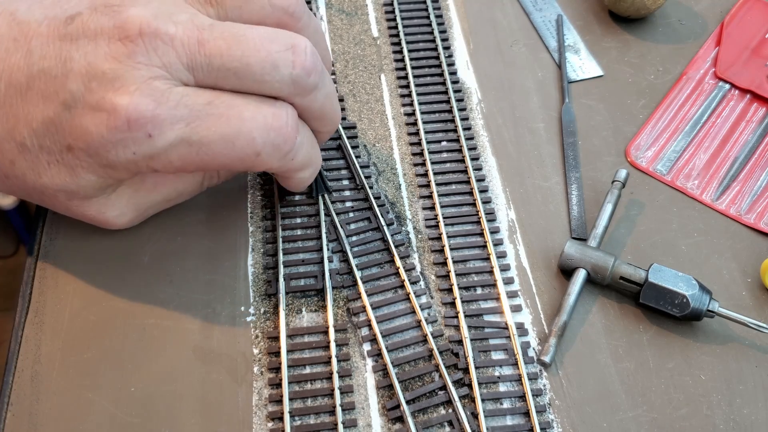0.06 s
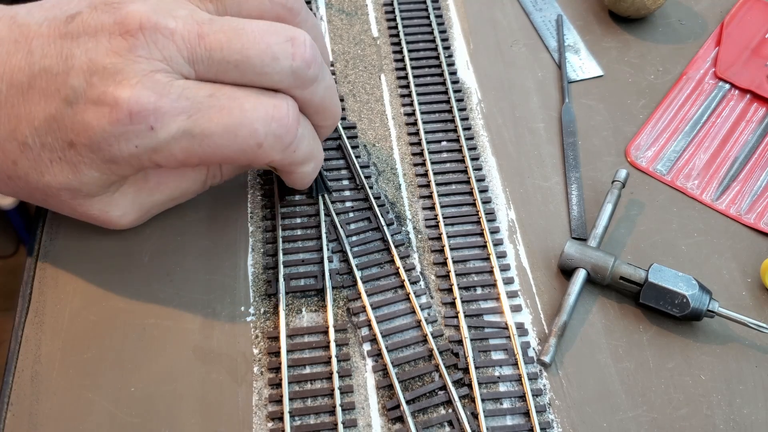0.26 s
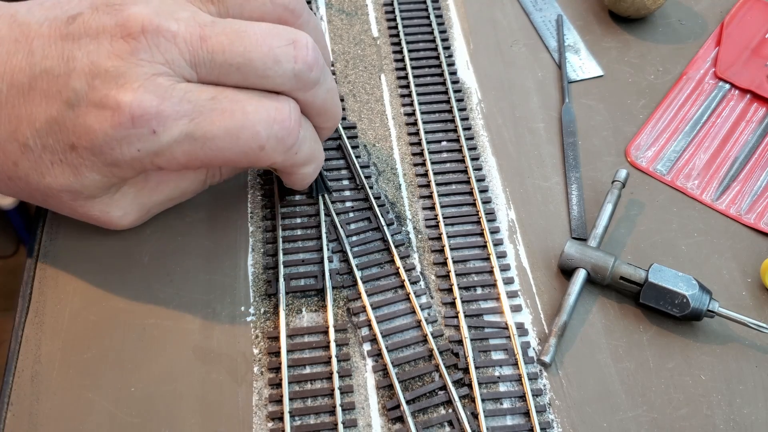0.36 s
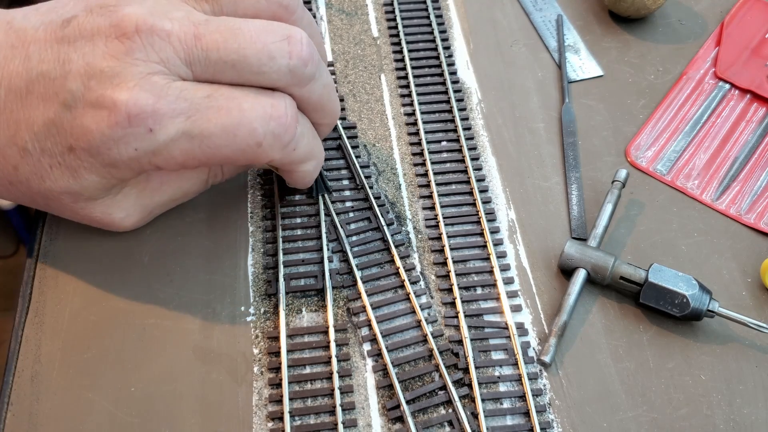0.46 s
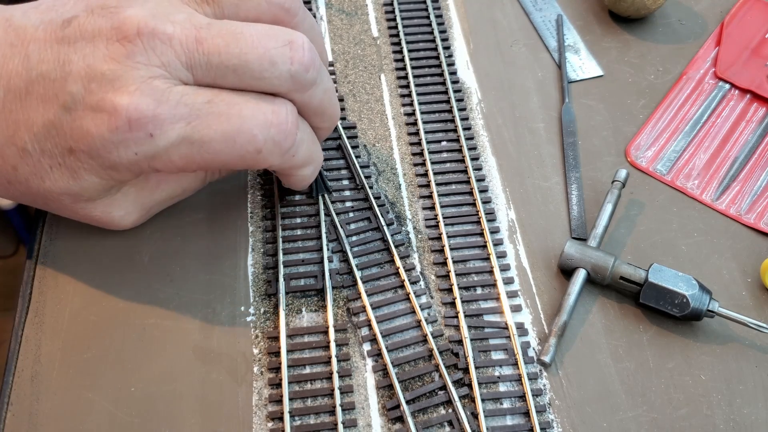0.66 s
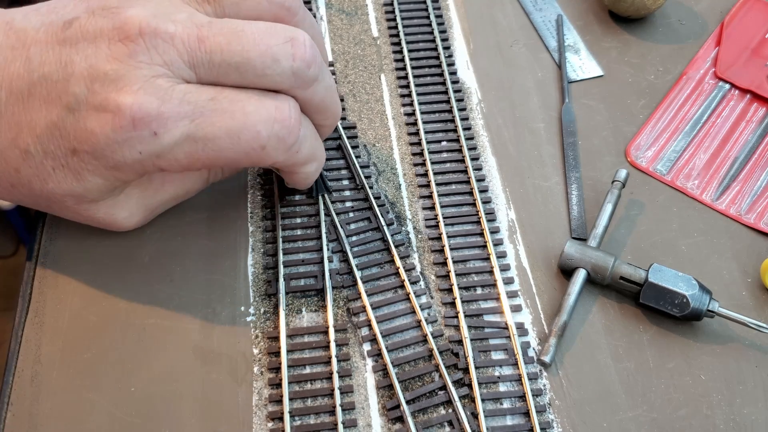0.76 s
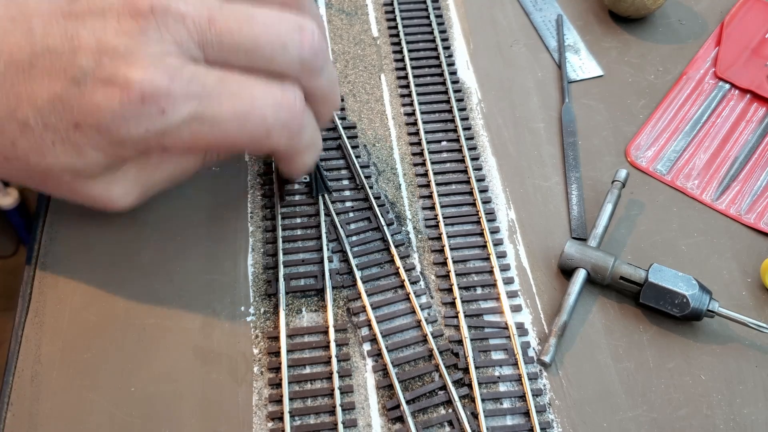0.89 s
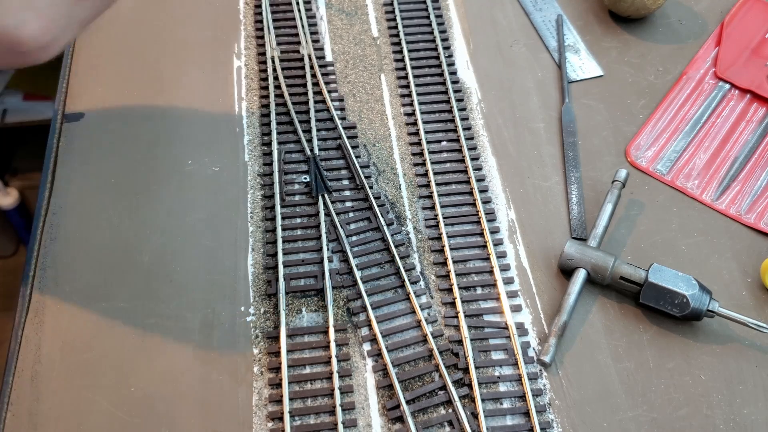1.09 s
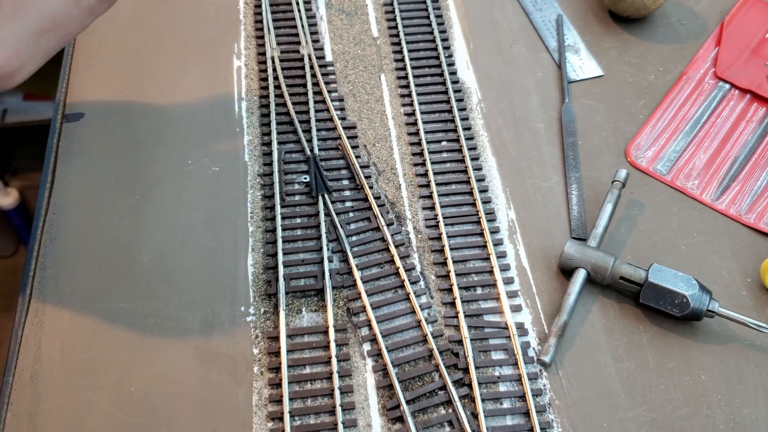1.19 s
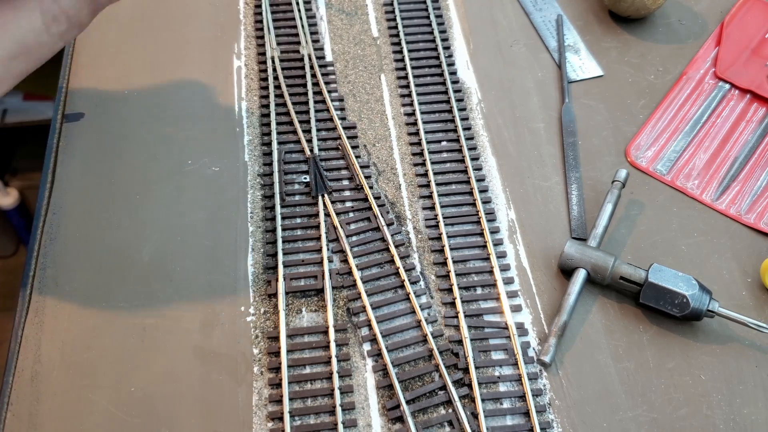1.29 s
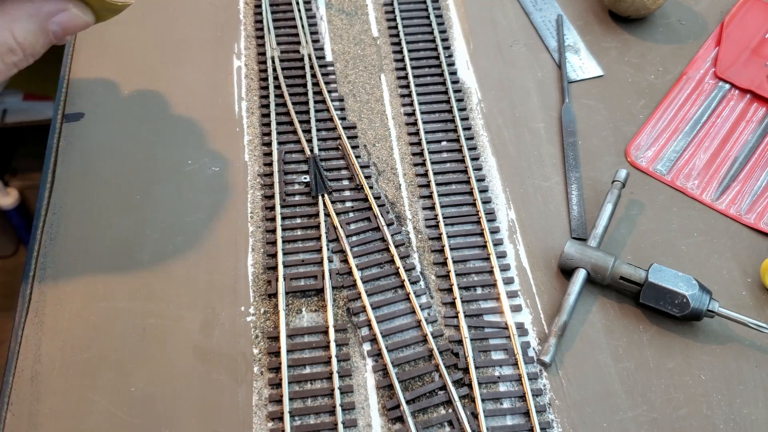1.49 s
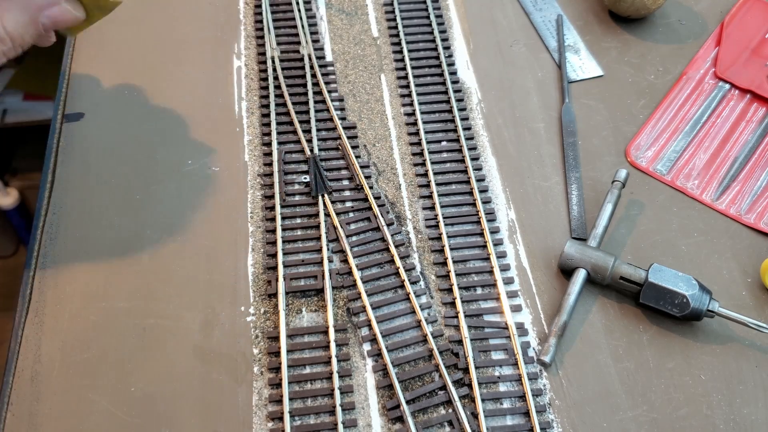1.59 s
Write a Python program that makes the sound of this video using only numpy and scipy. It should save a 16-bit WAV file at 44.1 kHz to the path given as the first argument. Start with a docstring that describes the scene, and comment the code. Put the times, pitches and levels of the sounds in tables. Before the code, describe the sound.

Sandpaper rubs a metal model rail in about seven short, light strokes during the first second, each stuttering with a little hiss and small knocks through the board. Two sharp clicks come at about 0.2 and 0.3 seconds. A brighter swipe ends the sanding near 0.9 seconds. A faint tick follows at 1.1, and a sleeve rustles softly until 1.6, all close up over a small room's low rumble.

```python
"""A small room with a low rumble, a stereo microphone close to a model track on its baseboard.
A scrap of sandpaper rubs a metal rail in short, light strokes. Each stroke stutters, shakes the board
and hisses a little; the rail clicks twice as the paper snags it. A last, brighter swipe runs off the
rail, then a faint tick, and a sleeve rustles as the arm draws back. The hand is nearer the left side."""
import sys
import numpy as np
from scipy import signal
from scipy.fft import rfft, irfft
from scipy.io import wavfile

SR = 44100
rng = np.random.default_rng(int(sys.argv[2]) if len(sys.argv) > 2 else 0)


def log_audio(samples):
    """Write samples as a 16-bit WAV file to the path given in sys.argv[1]."""
    # one column per channel
    frames = np.atleast_2d(samples).T
    # limit to full scale, then quantise
    limited = np.clip(frames, -1, 1)
    pcm = np.round(limited * 32767).astype(np.int16)
    wavfile.write(sys.argv[1], SR, pcm)


N = 72765

# Spectrum of a knock heard through the track: frequency_hz, gain_db
KNOCK_SPECTRUM = [(150, -29), (300, -7), (420, -13.5), (520, -4), (620, -7), (750, -5), (900, -4),
                  (1100, -3.5), (1330, 0.5), (1550, -12.5), (2000, -12.5), (2800, -18), (3800, -30),
                  (9000, -46)]
# Hiss of grit on metal: frequency_hz, gain_db
GRIT_SPECTRUM = [(500, 7.5), (2000, 4.5), (3000, -0.5), (3700, -3), (5000, 2.5), (7300, 5), (9500, -10.5),
                 (12000, -3), (15500, -2)]
# Spectrum of the snagged rail: frequency_hz, gain_db
SNAG_SPECTRUM = [(100, -31), (320, 2.5), (430, -18), (600, -1.5), (780, -1), (1100, 4), (1650, 6),
                 (2500, 8), (4000, -1.5), (5300, 9), (6300, 0.5), (7500, 4), (9500, -10), (11500, -7.5),
                 (15500, -16.5)]


def strokes(rail, board):
    """Seven light rubs of the sandpaper: each stutters, hisses and shakes the baseboard."""
    # start_s, rise_s, length_s, stutter_db, board_db, grit_db, judder_peak_fraction
    rubs = [(0.019, 0.0058, 0.064, -50.5, -47, -65, 0.47), (0.164, 0.016, 0.034, -51, -51, -54.5, 0.73),
            (0.31, 0.022, 0.044, -48, -48, -63, 0.62), (0.448, 0.0056, 0.032, -61, -50.5, -66.5, 0.55),
            (0.575, 0.0098, 0.065, -58, -47.5, -70, 0.57), (0.722, 0.011, 0.036, -55, -47.5, -67, 0.49),
            (0.849, 0.0043, 0.07, -57, -46.5, -70, 0.26)]
    for start, rise, length, stutter_db, board_db, grit_db, judder_peak in rubs:
        t = times(length)
        add(rail, start, stutter(t, pressure(t, rise, release_db=-8), stutter_db))
        add(rail, start, grit(t, pressure(t, rise, release_db=-21), GRIT_SPECTRUM, grit_db))
        add(board, start, baseboard(t, board_db, judder_peak))


def pressure(t, rise_s, release_db):
    """The hand's pressure builds, then eases by release_db to the end of the stroke."""
    return np.minimum(t / rise_s, 1) ** 2 * amp(release_db * np.maximum(t - rise_s, 0) / (t[-1] - rise_s))


def stutter(t, force, db):
    """The paper sticks and slips, knocking the track hardest at full pressure."""
    slips = force * grains(len(t), per_s=1100, spread_db=3)
    return at_level(knock(slips), db, t)


def knock(slips, lift_hz=1000, lift_db=0):
    """The track answers slips with a dull knock and a short ring."""
    # pitch_hz, level_db, t60_s
    track_modes = [(735, -2, .08), (855, -6, .06), (968, -5, .06), (1055, -3, .05), (1168, -4, .04),
                   (1235, -2, .04), (1335, -4, .04)]
    sound = amp(-15) * unit(signal.fftconvolve(slips, ringing(track_modes)))
    add(sound, 0, unit(colour(slips, KNOCK_SPECTRUM, lift_hz, lift_db)))
    return sound


def grit(t, force, spectrum, db):
    """Dense tiny scratches merge into a hiss that follows the force."""
    return at_level(colour(force * grains(len(t)), spectrum), db, t)


def baseboard(t, db, peak_fraction=0.4, mode_hz=323, decay_s=.003, flutter_db=4):
    """The slips lock on to the board's low mode, which judders until the stroke ends."""
    skew = np.log(.5) / np.log(peak_fraction)
    push = np.pad(abs(np.sin(np.pi * (t / t[-1]) ** skew)), (0, SR // 16))
    push *= amp(flutter_db * wander(len(push)))
    swing = signal.lfilter([1], [1, -np.exp(-1 / (decay_s * SR))], push)
    cycles = np.cumsum(mode_hz * (1 + .085 * wander(len(push)))) / SR
    return at_level(swing * np.sin(2 * np.pi * cycles), db, t)


def catches(rail, snap_s=.004):
    """The paper catches hard and lets go: the track knocks and a few grains snap free."""
    # start_s, knock_db, pitch_hz, snap_db
    hard_slips = [(0.0343, -48, 1100, -36), (0.056, -27, 1270, -60), (0.067, -32, 1240, -60),
                  (0.173, -20.5, 1240, -25.5), (0.452, -33.5, 1300, -57), (0.589, -21, 1120, -52),
                  (0.727, -21.5, 1200, -32.5), (0.7394, -27, 1070, -41), (0.855, -25.5, 1010, -57),
                  (0.921, -26, 1040, -46)]
    t = times(snap_s)
    for start, knock_db, hz, snap_db in hard_slips:
        sound = amp(knock_db) * knock(np.ones(1), hz, lift_db=10)
        snap = colour((1 - t / snap_s) * grains(len(t)), GRIT_SPECTRUM)
        add(sound, 0, amp(snap_db) * unit(snap))
        add(rail, start, sound)


def snags(rail, board):
    """The paper snags twice, clicking the rail, and drags on between the clicks."""
    # start_s, level_db, lift_hz, lift_db, ring_db
    clicks = [(0.2216, 5, 1296, 8, -17.5), (0.2812, 0, 5050, 9, -23)]
    for row in clicks:
        click(rail, board, *row)
    t = times(.056)
    drag = grit(t, pressure(t, rise_s=.003, release_db=-18), SNAG_SPECTRUM, db=-43)
    add(rail, .223, drag)


def click(rail, board, start_s, db, lift_hz, lift_db, ring_db, rise_s=.0003, decay_s=.0011):
    """A hard snap rings the metal rail, knocks the track and jolts the board."""
    # pitch_hz, level_db, t60_s
    rail_modes = [(733, 0, .16), (1279, -3, .1), (1612, -1, .12), (1735, -6, .1), (2320, -3, .12),
                  (2571, -3, .1), (2820, -4, .1), (3108, -3, .12), (4580, -8, .1), (5110, -7, .08),
                  (5480, -6, .08), (6101, -7, .08), (7488, -9, .08)]
    t = times(.25)
    chatter = np.sign(rng.standard_normal(len(t))) * np.minimum(t / rise_s, 1) * np.exp(-t / decay_s)
    blow = amp(-3) * unit(chatter)
    blow[0] = 1  # the snap itself, ahead of its chatter
    sound = unit(colour(blow, SNAG_SPECTRUM, lift_hz, lift_db))
    add(sound, 0, amp(ring_db) * ringing(rail_modes))
    knock_db = -14.5 - lift_db / 2  # brighter snaps knock less
    add(sound, 0, amp(knock_db) * unit(colour(np.ones(1), KNOCK_SPECTRUM)))
    add(rail, start_s, amp(db) * sound / 2)
    add(board, start_s, baseboard(times(.022), db - 57.5))


def swipe(rail, board, start_s=.921, peak_s=.033, length_s=.064):
    """The paper speeds up along the rail, stuttering and tearing coarse grains, and lifts off."""
    # frequency_hz, gain_db
    swipe_spectrum = [(250, -25), (700, 5.5), (850, -20), (1020, -4), (1700, 6), (2200, 2.5), (2600, -6),
                      (3200, 1), (4500, -6), (7000, -5), (9500, -13.5), (14500, -11), (16000, -14.5)]
    t = times(length_s)
    speed = amp(np.interp(t, [0, peak_s, t[-1]], [-18.5, 0, -24.5]))
    scrape = colour(speed * grains(len(t), per_s=3000, spread_db=3), swipe_spectrum)
    add(rail, start_s, at_level(scrape, -46, t))
    t = times(.035)
    add(rail, start_s, stutter(t, force=1, db=-46.5))
    add(board, start_s, baseboard(t, db=-50.5))


def tick(rail, board, start_s=1.14):
    """A faint tick with a high ring, once the hand has lifted."""
    # pitch_hz, level_db, t60_s
    tick_modes = [(3050, -2, .09), (3300, -5, .07), (3620, 0, .07)]
    click(rail, board, start_s, db=-29, lift_hz=3400, lift_db=10, ring_db=-16)
    add(rail, start_s, amp(-35) * ringing(tick_modes))


def sympathetic_ring(rail):
    """Every touch of the rail wakes a few narrow resonances of the track."""
    # pitch_hz, gain_db, t60_s
    resonances = [(733, 1, .17), (1050, -7, .08), (1614, -5, .1), (2320, -4, .13)]
    t, rings = times(.25), 0
    for hz, db, t60 in resonances:
        decay = amp(-60 * t / t60)
        rings += 2 * amp(db) * decay / decay.sum() * np.cos(2 * np.pi * hz * t)
    return signal.fftconvolve(rail, rings)[:N]


def sleeve():
    """Cloth fibres rub softly as the arm draws back, twice a little brighter."""
    # time_s, level_db
    slide_levels = [(1.08, -77.5), (1.16, -71.5), (1.23, -68.5), (1.33, -64.5), (1.44, -65.5),
                    (1.51, -71.5), (1.62, -98)]
    # frequency_hz, gain_db
    cloth_spectrum = [(300, -22), (800, -16), (1250, -11), (1750, 0), (2500, -2.5), (4000, -10),
                      (5000, -19), (8000, -29), (15000, -33)]
    # Brighter brushes of the cloth: start_s, length_s, level_db
    brushes = [(1.143, 0.037, -71.5), (1.37, 0.099, -67)]
    # frequency_hz, gain_db
    brush_spectrum = [(1000, -1), (2500, -11), (4000, -6.5), (7500, -9), (9500, -19), (15500, -12.5)]
    t = np.arange(N) / SR
    fibres = colour(grains(N, per_s=8100), cloth_spectrum)[:N]
    sound = at_level(fibres, np.interp(t, *np.transpose(slide_levels)), t) * (t > slide_levels[0][0])
    for start, length, db in brushes:
        t = times(length)
        add(sound, start, grit(t, np.sin(np.pi * t / length), brush_spectrum, db))
    return sound


def table_shudder(centre_hz=56, half_width_hz=13):
    """The table shudders low while the hand works on it."""
    # time_s, level_db
    shudder_levels = [(0, -60), (.24, -62), (.4, -71), (.8, -67), (1.1, -70), (1.35, -71), (1.65, -83)]
    hz, t = np.fft.rfftfreq(N, 1 / SR), np.arange(N) / SR
    noise = irfft(rfft(rng.standard_normal(N)) / (1 + ((hz - centre_hz) / half_width_hz) ** 2), N)
    return at_level(noise, np.interp(t, *np.transpose(shudder_levels)), t)


def room(x, echoes_per_s=2000, early_decay_s=.006, tail_rise_s=.0026):
    """Quick echoes off the table top, then the small room's short tail."""
    # frequency_hz, t60_s
    decay_times = [(200, .2), (1000, .18), (2500, .21), (6000, .205), (14000, .18)]
    t = times(.5)
    hz, when, spectra = signal.stft(rng.standard_normal((2, len(t))), SR, nperseg=256)
    spectra *= amp(-60 * when / at_hz(decay_times, hz)[:, None])
    tail = signal.istft(spectra, SR, nperseg=256)[1][:, :len(t)] * np.minimum(t / tail_rise_s, 1)
    early = np.sign(rng.standard_normal(tail.shape)) * (rng.random(tail.shape) < echoes_per_s / SR)
    early *= np.exp(-t / early_decay_s) * (t > .001)
    echoes = amp(-5.5) * unit(tail) + amp(-2) * unit(early)
    return signal.fftconvolve(x[None], echoes, axes=1)[:, :N]


def room_tone(rumble_top_hz=211, level_db=-62):
    """Low rumble, alike on both sides and easing at the end, with a faint hiss."""
    # frequency_hz, density_db
    tone_spectrum = [(20, -16), (35, -16), (55, -5), (82, 3), (105, -2), (135, 3), (185, -15), (240, -13),
                     (320, -7), (500, -18), (1000, -20.5), (2000, -23.5), (4000, -28), (7000, -29),
                     (9000, -38), (15500, -31.5)]
    # Likeness of left and right: frequency_hz, correlation
    likeness = [(50, .95), (130, .9), (300, .6), (700, .1), (3000, 0)]
    # time_s, gain_db
    rumble_levels = [(1.1, -1), (1.4, -5), (1.6, -6.5)]
    hz, t = np.fft.rfftfreq(N, 1 / SR), np.arange(N) / SR
    left, independent = rfft(rng.standard_normal((2, N)))
    alike = at_hz(likeness, hz)
    right = alike * left + np.sqrt(1 - alike ** 2) * independent
    spectra = np.array([left, right]) * amp(at_hz(tone_spectrum, hz))
    easing = amp(np.interp(t, *np.transpose(rumble_levels)))
    rumble = easing * irfft(spectra * (hz < rumble_top_hz), N)
    hiss = irfft(spectra * (hz >= rumble_top_hz), N)
    return at_level(rumble + hiss, level_db, t)


def microphone(x, right_db=-2.5, delay_s=.00029):
    """The right capsule is farther from the hand: direct sound arrives later and weaker."""
    delay = np.exp(-2j * np.pi * np.fft.rfftfreq(N, 1 / SR) * delay_s)
    return np.array([x, amp(right_db) * irfft(rfft(x) * delay, N)])


def grains(count, per_s=4200, spread_db=2.5):
    """Tiny impacts of uneven size at random moments."""
    chance, size, sign = rng.random((3, N))[:, :count]
    size_db = -spread_db * np.log(np.maximum(size, np.exp(-2) / 2))
    return (chance < per_s / SR) * amp(size_db) * np.sign(sign - .5)


def ringing(modes):
    """The dying modes of a struck part."""
    t = times(.25)
    return unit(sum(amp(db - 60 * t / t60) * np.sin(2 * np.pi * (hz * t + rng.random()))
                    for hz, db, t60 in modes))


def wander(count, smooth_s=.0024):
    """Smooth random drift of size about 1."""
    window = np.hanning(2 * round(smooth_s * SR) + 3)
    return signal.fftconvolve(rng.standard_normal(SR // 2), unit(window), "valid")[:count]


def colour(x, spectrum, lift_hz=1000, lift_db=0, lift_octaves=.33, size=2048):
    """Minimum-phase filter with the given spectrum and an optional broad peak."""
    hz = abs(np.fft.fftfreq(size, 1 / SR))
    lift = lift_db * np.exp(-(np.log2((hz + 1) / lift_hz) / lift_octaves) ** 2)
    log_gain = np.log(amp(at_hz(spectrum, hz) + lift))
    impulse = np.fft.ifft(np.exp(np.conj(signal.hilbert(log_gain)))).real
    return signal.fftconvolve(x, impulse[:size // 2])


def at_hz(points, hz):
    """Reads a table on a log-frequency axis."""
    frequencies, values = np.transpose(points)
    return np.interp(np.log(hz + 1), np.log(frequencies), values)


def times(length_s):
    """Sample times in seconds."""
    return np.arange(0, length_s, 1 / SR)


def amp(db):
    """Decibels to gain."""
    return 10 ** (np.asarray(db) / 20)


def unit(x):
    """Scales a sound to energy 1."""
    return x / np.sqrt(np.sum(x ** 2, -1, keepdims=True) + 1e-20)


def at_level(x, db, t):
    """Gives a sound the mean level db over the times t."""
    return amp(db) * np.sqrt(len(t)) * unit(x)


def add(mix, start_s, sound):
    """Mixes a sound in at start_s."""
    part = mix[round(start_s * SR):][:len(sound)]
    part += sound[:len(part)]


def scene():
    """Rail, baseboard and sleeve close to the microphone, with the room behind."""
    rail, board = np.zeros((2, N))
    strokes(rail, board)
    catches(rail)
    snags(rail, board)
    swipe(rail, board)
    tick(rail, board)
    rail += sympathetic_ring(rail)
    cloth = sleeve()
    direct = microphone(rail) + microphone(board, right_db=-14) + microphone(cloth, delay_s=.0005)
    return direct + room(rail + cloth + amp(-16) * board) + table_shudder() + room_tone()


def record(dry):
    """The recorder's band limit."""
    lowpass = signal.firwin(511, 15950, window=("kaiser", 9), fs=SR)
    return signal.oaconvolve(dry, lowpass[None], "same")


dry = scene()
out = record(dry)
log_audio(out)
```